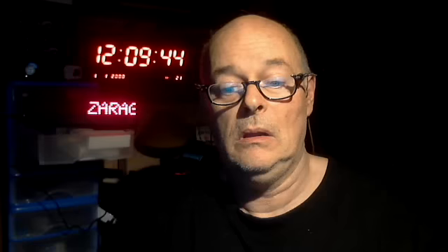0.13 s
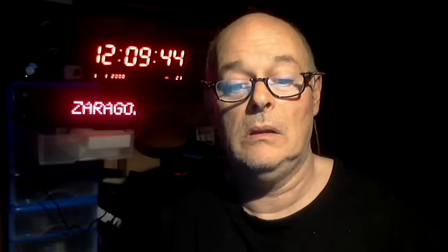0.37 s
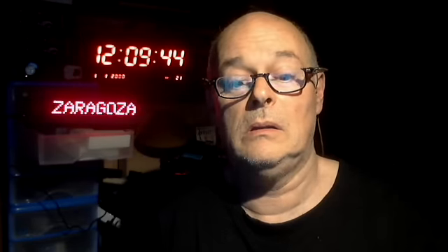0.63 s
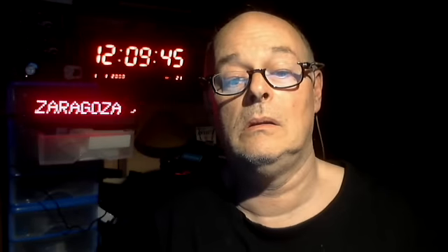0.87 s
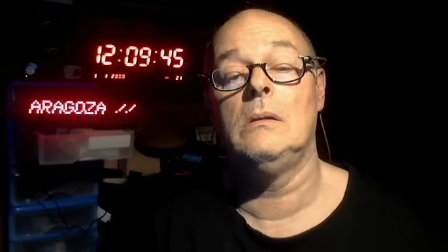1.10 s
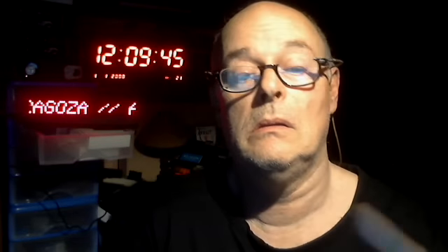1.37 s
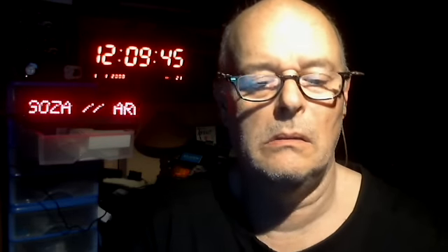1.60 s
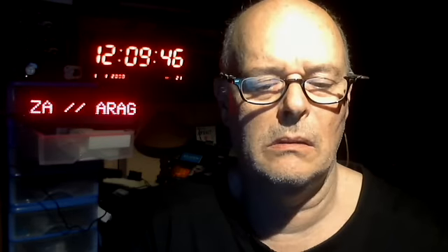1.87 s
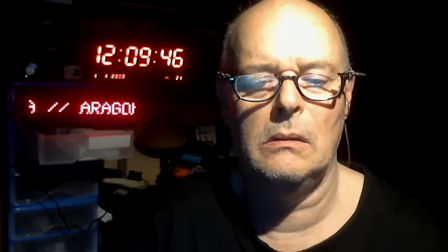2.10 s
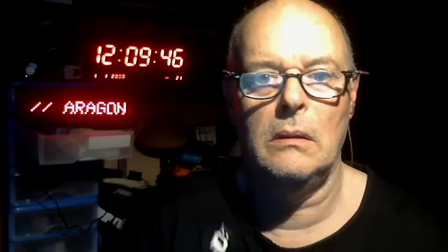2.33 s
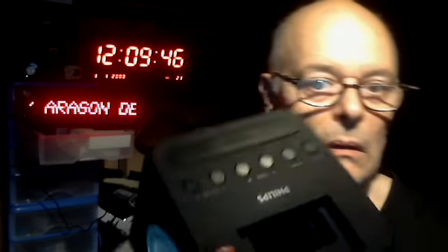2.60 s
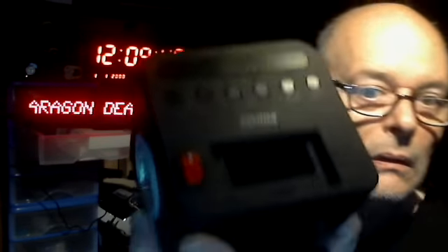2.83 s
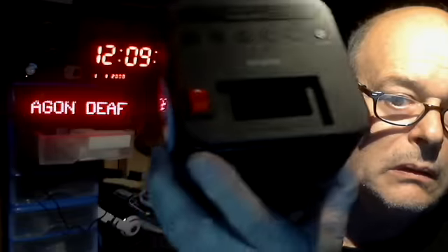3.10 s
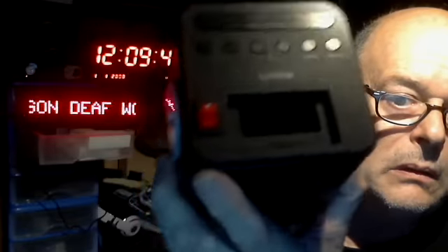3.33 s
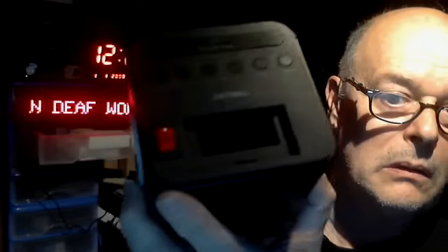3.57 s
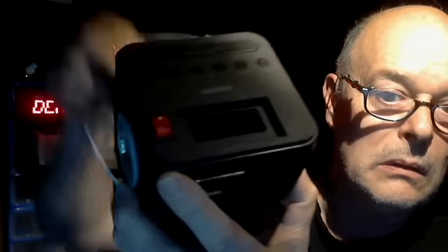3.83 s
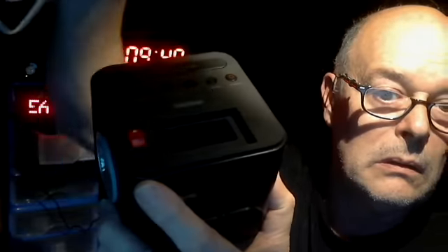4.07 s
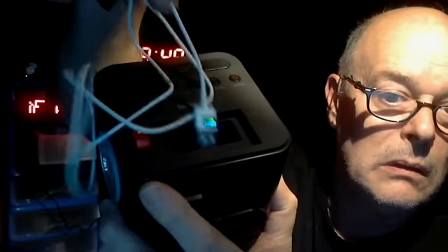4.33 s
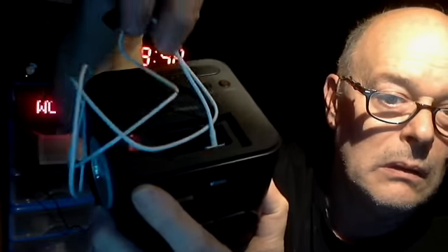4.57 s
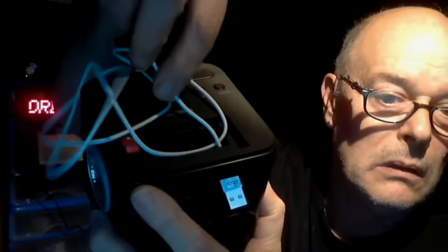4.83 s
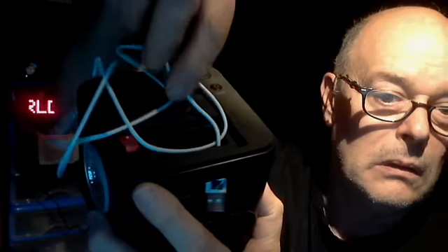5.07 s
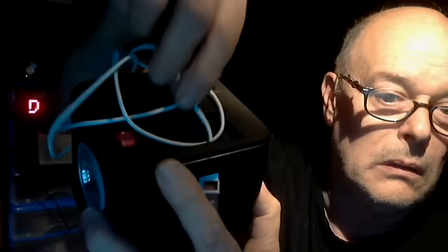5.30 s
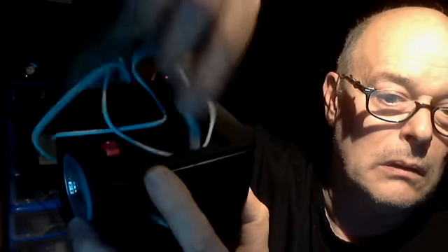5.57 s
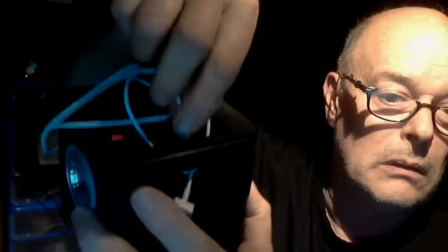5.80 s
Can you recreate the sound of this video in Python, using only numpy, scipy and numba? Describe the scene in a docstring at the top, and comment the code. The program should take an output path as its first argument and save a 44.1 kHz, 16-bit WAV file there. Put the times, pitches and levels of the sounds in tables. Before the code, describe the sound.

A quiet, dry room with a low steady fan, faint hiss and thin motor whine, heard through a small close microphone. Very faint touches open it; a crisp click comes at 0.9 s and a stronger one at 1.5 s, followed by small ticks and light rubbing. At 2.1 s a hard, loud plastic knock nearly overloads the microphone, with a low grip thump and soft finger slides. Small clicks follow around 2.6 s and a dull thump at 2.9 s. From 3.3 to 3.8 s there is only smooth palm hiss and muted hollow finger rubbing. A click at 3.95 s, then from 4.3 to 4.8 s a cluster of dry, bright plug taps on the hollow case. Wire brushes and a rub come at 5.1-5.3 s. From 5.4 s taps crowd into a sharp, irregular, loud rattle with gritty cable scraping, continuing almost to the end near 5.9 s.

```python
"""Plugs tap and rattle on a hollow plastic case close to a small microphone in a quiet room: noise rings its modes.
Wires brush the case (swelling noise, same modes) and drag on each other (gritty noise, fixed resonances).
Fingers slide and sound its cavity, a palm hisses, grips thump: friction noise through resonances.
Fan noise, a faint rustle and whine lines fill the pauses; the loudest blows overload the input."""
import sys
import numpy as np
from scipy import signal
from scipy.fft import rfft, irfft
from scipy.io import wavfile
from scipy.ndimage import uniform_filter1d
from numba import njit

SR = 44100
rng = np.random.default_rng(int(sys.argv[2]) if len(sys.argv) > 2 else 0)


def attenuation_scalar(level_db):
    """Turn a level in dB into a linear amplitude multiplier (20 dB per decade)."""
    decades = np.asarray(level_db, float) / 20
    return 10 ** decades


def dump_mix(stems):
    """Bounce the given channels to the path in sys.argv[1] as a 16-bit WAV at rate SR."""
    frames = np.atleast_2d(stems).T  # one column per channel
    limited = np.clip(frames, -1, 1)  # hard clip at full scale
    pcm = np.round(limited * 32767).astype(np.int16)
    wavfile.write(sys.argv[1], SR, pcm)


N = 261513

# sudden taps: (time [s], peak at 2.5-5 kHz before tail cut [dB], boom tilt 0.3-1.2 kHz [dB],
# tick tilt 5-8 kHz [dB], rattle t60 [s], favoured ring [Hz])
PLUG_TAPS = [(.214, -47, 2.5, 2, 0.057, 494), (.9023, -19.5, -30, -17, .09, 4260),
             (.9737, -48.5, -12, -3, .06, 4150), (1.308, -32, -5, -5, 0.069, 800),
             (1.5017, -12, -14.5, -3, 0.094, 3700), (1.6005, -28, -12, -10.5, 0.14, 2070),
             (1.7912, -46, 17, -12, 0.041, 1140), (2.0935, 1.5, -9, -11.5, 0.074, 720),
             (2.1022, -11.5, -9.5, -8, 0.12, 800), (2.5527, -16.5, -34, -4, 0.035, 4400),
             (2.5698, -25, -10, -7, 0.036, 872), (2.6284, -30, 1, 4.5, 0.14, 730),
             (2.6669, -23.5, -16, -28, 0.085, 1530), (2.9379, -27.5, 0, -21.5, 0.19, 860),
             (3.1016, -41.5, -11.5, -18.5, 0.06, 1560), (3.9452, -23, -24.5, -1, 0.055, 5640),
             (4.338, -13, -32, -7, 0.046, 3570), (4.3675, -21, -25, -9, 0.056, 2350),
             (4.3934, -5.5, -10.5, -11.5, 0.041, 1000), (4.423, -11, -28.5, -1, 0.055, 1780),
             (4.4685, -5.5, -42, -5, 0.091, 4300), (4.4831, -13, -30, -18, 0.062, 1770),
             (4.5717, -30.5, -43.5, -18, .032, 1780), (4.7104, -12, -23.5, -11.5, 0.09, 1780),
             (4.8051, -13.5, -29, -16, 0.033, 1780), (4.9937, -37, -15.5, -1.5, .065, 6850),
             (5.0398, -32.5, -39, -23.5, 0.038, 3060), (5.2724, -9.5, -19, -6, 0.024, 3930),
             (5.4003, -31, -6, 2.5, 0.041, 501), (5.4128, -18, -35, -35, 0.019, 1780),
             (5.4419, -20.5, -10, -5.5, 0.027, 3900), (5.4743, 4.5, -15.5, -2, 0.076, 5840),
             (5.5262, -15.5, -15, -5.5, 0.076, 6000), (5.5794, -16.5, -19.5, -10, 0.1, 4080),
             (5.5877, -20, -39, -14, 0.06, 2720), (5.601, -3, -5, 7, 0.039, 6570),
             (5.6082, 1.6, -27, -1.5, 0.057, 3100), (5.6508, -2.5, -16.5, -1, 0.055, 4030),
             (5.6679, -1.5, -16, -32, 0.082, 3800), (5.674, 1.3, -38, -11, 0.026, 3930),
             (5.7292, -1, -9, -2.5, 0.067, 3200), (5.7519, -2.5, -8.5, -8, 0.047, 4000),
             (5.8189, -14.5, -30, -4, 0.043, 6530), (5.8438, -4.5, -16, -13.5, 0.049, 3900)]
TAP_HELD_S, HELD_PER_T60 = 0.008, 0.4  # free ring: fixed time plus a share of the rattle
TAP_KNOCK_DB, TAP_EDGE_DB = -4, -17.5  # 1.2-2.5 and 9-16 kHz, before boom and tick pull them along


def taps():
    """Plugs knocking on the case: dry, with a little ring."""
    rows = []
    for s, db, boom, tick, t60, hz in PLUG_TAPS:
        colour = colours(boom, tick, hz, TAP_KNOCK_DB, TAP_EDGE_DB)
        rows.append((s, db, *colour, t60, TAP_HELD_S + HELD_PER_T60 * t60, hz))
    return strike(rows, tap, spot_db=2.5, broad_db=-3, favour_db=9)


def tap(t, rattle, t60, end_s, click=6.0):
    """A hard one-sample click and a dying rattle."""
    rise = np.minimum(t / 0.0003, 1)
    return rise * attenuation_scalar(-60 * t / max(t60, 0.005)) * rattle + click * (t == 1 / SR)


# wires brushing past: (time [s], peak at 2.5-5 kHz before tail cut [dB], boom tilt [dB], tick tilt [dB],
# length [s], favoured ring [Hz])
WIRE_BRUSHES = [(0.024, -54, 5.5, 6, 0.026, 6700), (0.372, -40, 1, 13.5, 0.055, 6170),
                (0.399, -31, -27, -2, 0.054, 1500), (0.843, -35.5, -60, -4, 0.072, 4130),
                (1.147, -33.5, -47, -9, 0.056, 2100), (1.276, -40.5, -11, 0, 0.042, 3930),
                (1.493, -26.5, -8, 1, 0.027, 4300), (1.653, -20, -4.5, -7.5, 0.096, 3930),
                (1.862, -29, -4, 4, .045, 6050), (2.032, -31, -5, -7.5, 0.27, 1140),
                (2.135, -22, 2.5, -9, .11, 2790), (2.225, -34, 2, -20.5, 0.036, 3500),
                (2.524, -37.5, -11, -6.5, 0.044, 1500), (2.563, -27.5, -2.5, -3.5, 0.12, 2100),
                (2.628, -27.5, -4.5, -2, 0.047, 6700), (2.661, -20.5, -19, -7.5, .055, 6750),
                (2.924, -38, 13, -6, 0.022, 415), (2.951, -31, 1, 1.5, 0.047, 800),
                (3.031, -46.5, -1.5, -4, 0.053, 1500), (3.107, -61, -11, 11.5, 0.031, 7300),
                (3.939, -31.5, -30, -2, 0.018, 6400), (4.544, -40.5, -56, -11.5, 0.033, 3090),
                (4.702, -24.5, -48, -5, 0.023, 4800), (4.729, -30.5, -41, -19, 0.11, 2800),
                (5.062, -25.5, -16.5, -16.5, .04, 3070), (5.118, -19, -11.5, -13.5, 0.059, 3930),
                (5.195, -11, -16.5, -6, 0.057, 6330), (5.315, -11, -13, -5.5, .045, 6400),
                (5.447, -21.5, -20, -19, 0.048, 3070), (5.659, -13.5, -27, -3, 0.024, 3007),
                (5.775, -14.5, -24, -6.5, 0.045, 3090), (5.865, -24, -4, -28, 0.013, 800)]
SWELL_SHARE, SWELL_MAX_S = 0.44, 0.027
BRUSH_KNOCK_DB, BRUSH_EDGE_DB = -0.5, -24.5  # before boom and tick pull them along


def brushes():
    """Wires sweeping the case: each swells for a share of its length."""
    rows = []
    for s, db, boom, tick, length_s, hz in WIRE_BRUSHES:
        colour = colours(boom, tick, hz, BRUSH_KNOCK_DB, BRUSH_EDGE_DB)
        swell_s = min(SWELL_SHARE * length_s, SWELL_MAX_S)
        rows.append((s, db, *colour, swell_s, length_s, hz))
    return strike(rows, brush, spot_db=1.5, broad_db=0, favour_db=8)


def brush(t, rattle, swell_s, end_s):
    """Soft contact: the noise swells, then sags until the wire lets go."""
    swell = (t / swell_s) ** 0.8
    sag = attenuation_scalar(-16 * (t - swell_s) / max(end_s - swell_s, 0.005))
    return rattle * np.where(t < swell_s, swell, sag)


KNOCK_PER_BOOM, EDGE_PER_TICK, RING_LIFT_DB = 0.2, 1.6, 9.5


def colours(boom, tick, ring_hz, knock_db, edge_db):
    """Boom, knock, tick and edge of one contact: knock follows boom and a ring near it, edge follows tick."""
    lift = RING_LIFT_DB * abs(ring(ring_hz, 1700, 700)) ** 2
    return boom, knock_db + KNOCK_PER_BOOM * boom + lift, tick, edge_db + EDGE_PER_TICK * tick


# modes of the plastic case: (frequency [Hz], relative level [dB], t60 [s])
CASE_MODES = [(211, -7.5, 0.18), (415, 12.5, 0.11), (599, 7.5, 0.027), (736, -3, 0.035), (800, 2, 0.029),
              (925, -20, 0.055), (1140, -8.5, 0.043), (1376, 0, 0.0061), (1500, 6, .035), (1780, 8, 0.041),
              (2100, -9.5, 0.013), (2350, -16.5, 0.058), (2800, 4, 0.02), (3085, 5, 0.036),
              (3500, -22, 0.075), (3930, 1.5, 0.0069), (4130, 0, 0.0083), (4300, 2.5, 0.033),
              (4800, -4, 0.002), (5400, -4.5, 0.002), (6220, 3, 0.017), (6190, -2, 0.0034),
              (6750, 4.5, 0.0045), (7300, -8.5, 0.0081), (8010, -7, 0.023), (9200, 7, 0.0022)]


def strike(rows, force, spot_db, broad_db, favour_db, size=8192, lead=256):
    """Each force rings the case; the touched spot sets each mode's share, the row sets the colour."""
    out = np.zeros(N + size)
    index = np.arange(size)
    t = np.maximum(index - lead, 0) / SR
    hz = np.fft.rfftfreq(size, 1 / SR)
    modes = np.array([attenuation_scalar(db) * ring(hz, f, np.log(1000) / np.pi / t60) for f, db, t60 in CASE_MODES])
    mode_hz = np.transpose(CASE_MODES)[0]
    core = (hz > 2500) & (hz < 5000)
    for s, peak_db, boom_db, knock_db, tick_db, edge_db, shape_s, end_s, ring_hz in rows:
        spot, rattle = rng.standard_normal(len(CASE_MODES)), rng.standard_normal((2, size))
        favour = abs(ring(mode_hz, ring_hz, 0.08 * ring_hz))
        share = attenuation_scalar(spot_db * spot + favour_db * favour) * np.sign(spot)
        colour = shape([(110, boom_db - 52.5), (330, boom_db + 2), (1000, boom_db + 13.5),
                        (1700, knock_db), (3500, 0), (6500, tick_db + 0.37), (7600, tick_db - 5),
                        (9500, edge_db + 2), (12000, edge_db - 7), (15000, edge_db - 19),
                        (18000, edge_db - 31.5)], hz)
        # the contact stutters within a few milliseconds
        stutter = attenuation_scalar(28 * uniform_filter1d(rattle[1], size=120))
        push = force(t, rattle[0] * stutter, shape_s, end_s) * (t > 0)
        sound = rfft(push) * colour * (share @ modes + attenuation_scalar(broad_db))
        # nearby surfaces send it back as a short diffuse wash
        wash = rng.standard_normal(size) * attenuation_scalar(-29 - 60 * index / SR / 0.068)
        sound += sound * rfft(wash)
        # each sound's tail is cut short, falling away faster and faster
        tail_cut = attenuation_scalar(-6 * (np.maximum(t - end_s, 0) / 0.009) ** 2) * np.minimum(index / lead, 1)
        core_peak = np.abs(irfft(sound * core)).max()
        i = int(s * SR) - lead
        out[i:i + size] += irfft(sound) * tail_cut * attenuation_scalar(peak_db) / core_peak
    return out[:N]


# fingers sliding over the case: (time [s], length [s], cavity [dB], overtones [dB], starting overtone centre [Hz])
FINGER_SLIDES = [(0.404, .04, -41, -53, 1189), (0.452, .075, -42, -43.5, 1318),
                 (1.609, .14, -37.5, -39, 1150), (1.796, .2, -43.5, -44, 1230),
                 (2.013, 0.089, -42, -40, 1100), (2.116, .13, -29, -31, 880),
                 (2.248, 0.059, -42, -32, 1250), (2.284, 0.1, -40.5, -29.5, 1350),
                 (2.359, .095, -56, -29.5, 887), (3.07, .07, -39.5, -59.5, 1100),
                 (3.299, 0.15, -31, -48.5, 1260), (3.461, .07, -50, -59, 1000),
                 (3.531, .04, -39, -54, 1000), (3.564, 0.11, -30, -45, 1299),
                 (3.665, 0.067, -32.5, -58, 1104), (3.744, .07, -31.5, -48, 966),
                 (3.816, .09, -45, -57, 1000), (3.95, 0.14, -42, -48, 780), (4.052, .1, -41, -46.5, 779),
                 (4.165, .09, -61, -51.5, 859), (5.044, 0.076, -74, -36.5, 1000),
                 (5.146, .235, -35, -42.5, 1050), (5.389, .055, -24, -44, 1000),
                 (5.512, .055, -28.5, -42, 1050), (5.617, 0.067, -58, -24.5, 830),
                 (5.743, .16, -44, -31.5, 880)]
SLIDE_ATTACK_S, SLIDE_RELEASE_S, SLIDE_SAG_DB, LIFT_DB = 0.029, 0.03, -6, -13
CENTRE_SAG = 0.88  # ratio, applied once by the release and again by lift-off


def slides():
    """Each slide: touch, sagging hold, lift-off; the overtone centre falls as the fingers slow down."""
    stretches = []
    for s, length_s, cavity, over, hz in FINGER_SLIDES:
        release_s = s + max(length_s - SLIDE_RELEASE_S, SLIDE_ATTACK_S)
        stretches.append([
            (s, cavity + LIFT_DB, over + LIFT_DB, hz),
            (s + SLIDE_ATTACK_S, cavity, over, hz),
            (release_s, cavity + SLIDE_SAG_DB, over + SLIDE_SAG_DB, hz * CENTRE_SAG),
            (s + length_s, cavity + LIFT_DB, over + LIFT_DB, hz * CENTRE_SAG ** 2)])
    return stretches


# cavity overtones: (centre [Hz], width per stage [Hz], relative level [dB])
CAVITY_OVERTONES = [(800, 200, 2.5), (1000, 360, -3.5), (1230, 76, 7), (1460, 340, -2)]
CAVITY_HZ, CAVITY_STAGE_WIDTH_HZ = 420.5, 84


def fingers():
    """Sliding skin drives the cavity and, through a moving band, its overtones."""
    cavity_gain, overtone_db, overtone_hz = played(slides())
    on = cavity_gain > 0
    touching = np.minimum(uniform_filter1d(1.0 * on, size=400), 1) * on
    cavity = cavity_gain * resonant(grit(75, 2.6), [(CAVITY_HZ, CAVITY_STAGE_WIDTH_HZ, 0)])
    rub = resonant(grit(70, 2.5), CAVITY_OVERTONES)
    overtones = unit(sweep(rub, np.maximum(overtone_hz, 500), 370.0))
    return cavity + overtones * attenuation_scalar(overtone_db) * touching


# grip shifting: (time [s], length [s], thump [dB], deep part re thump [dB])
GRIP_SHIFTS = [(0.433, 0.063, -51, -2), (1.668, 0.052, -46.5, 0), (2.076, .13, -25, -9),
               (2.227, 0.052, -41, -39), (2.291, 0.15, -34, 0), (2.55, 0.18, -30, -6.5),
               (2.911, .11, -17.5, 0), (3.02, 0.14, -37, 4), (3.957, .1, -34.5, -13),
               (4.097, .07, -41.5, -9), (5.142, 0.28, -41.5, -7)]
GRIP_RISE_SHARE, GRIP_START_DB, GRIP_END_DB = 0.28, -12, -21.5


def grips():
    """Each shift of the grip: a quick squeeze, then a slower easing."""
    return [[(s, db + GRIP_START_DB, deep),
             (s + GRIP_RISE_SHARE * length_s, db, deep),
             (s + length_s, db + GRIP_END_DB, deep)] for s, length_s, db, deep in GRIP_SHIFTS]


# thump resonances: (centre [Hz], width per stage [Hz], relative level [dB])
THUMP_PEAKS = [(160.5, 50, -1), (192, 84, 1)]
# deep thump resonance: (centre [Hz], width per stage [Hz], relative level [dB])
DEEP_PEAKS = [(85, 24, 0)]


def thumps():
    """Grip shifts drive low resonances with unsteady noise."""
    gain, deep_db = played(grips())
    deep = attenuation_scalar(deep_db) * resonant(grit(19, 1.7), DEEP_PEAKS)
    return gain * (resonant(grit(30, 5.4), THUMP_PEAKS) + deep)


# palm gliding over the plastic, one list per stretch: (time [s], level [dB], centre [Hz])
PALM_GLIDES = [
    [(1.3, -70, 7200), (1.8, -57, 7000), (2.26, -77, 6300), (2.306, -50.5, 6390), (2.44, -74, 6430)],
    [(3.27, -70, 7200), (3.348, -41.5, 7300), (3.456, -38.5, 7440), (3.5, -51.5, 5880), (3.52, -41, 5230),
     (3.62, -45, 6230), (3.74, -47, 6460), (3.765, -57, 6390), (4.05, -68, 7000), (4.2, -61, 7000),
     (4.3, -72, 6700)],
]
# skin hiss bands: (centre [Hz], width per stage [Hz], relative level [dB])
SKIN_BANDS = [(3580, 140, -8.5), (4660, 130, 7), (5130, 180, -20), (5600, 340, 8), (5720, 150, -2.5),
              (6640, 310, 3), (7250, 220, -3), (7315, 200, 4), (7970, 270, -8.5), (8650, 290, -8),
              (9130, 230, -11)]


def palm():
    """Friction hiss in fixed bands; the contact patch favours one region, which wanders."""
    gain, glide_hz = played(PALM_GLIDES)
    bands = resonant(grit(120, 1.6), SKIN_BANDS)
    centre_hz = np.clip(glide_hz, 3000, 9000)
    favoured = sweep(sweep(bands, centre_hz, 2400.0), centre_hz, 2400.0)
    skin = favoured + 0.34 * bands
    return gain * skin / np.std(skin[gain > 0])


# wires dragging on each other, one list per stretch: (time [s], level [dB])
WIRE_DRAGS = [
    [(1.6, -74), (1.676, -38), (1.77, -62)],
    [(5.17, -66.5), (5.23, -43.5), (5.546, -36.5), (5.67, -28), (5.818, -42.5), (5.92, -48.5)],
]


def drags():
    """Gritty wire friction through a broad hump and the case's upper modes."""
    def walls(hz):
        hump = ring(hz, 3270, 5600) / (1 + (hz / 8500) ** 6)
        return hump * (0.46 + sum(attenuation_scalar(db) * ring(hz, f, 250) for f, db, _ in CASE_MODES[8:]))
    return played(WIRE_DRAGS)[0] * unit(through(grit(150, 2.5), walls))


def played(tables):
    """Columns of all stretches on the time axis; the first is a level, faded in and out at each end."""
    out = np.ones((len(tables[0][0]) - 1, N))
    out[0] = 0
    for rows in tables:
        s, db, *columns = np.transpose(rows)
        now = np.arange(int(s[0] * SR), min(int(s[-1] * SR), N))
        for k, column in enumerate(columns):
            out[k + 1, now] = np.interp(now / SR, s, column)
        to_end = np.minimum(now - now[0], now[-1] - now)
        fade = np.minimum(to_end / (0.0073 * SR), 1)
        out[0, now] += attenuation_scalar(np.interp(now / SR, s, db)) * fade
    return out


# room noise spectrum: (frequency [Hz], relative density [dB])
ROOM_SPECTRUM = [(25, -64.5), (60, -17.5), (100, -6), (145, 2.5), (215, -12.5), (280, -12.5), (700, -9),
                 (1100, -11.5), (1500, -13.5), (2600, -22), (4200, -20), (6500, -21), (7500, -21),
                 (8300, -31), (11000, -40.5), (17000, -71)]
SPLIT_HZ, FAN_DB = 1300, -58


def fan():
    """Fan: the lower part of the room noise, its level barely wavering."""
    bass = through(rng.standard_normal(N),
                   lambda hz: shape(ROOM_SPECTRUM, hz) / (1 + (hz / SPLIT_HZ) ** 4))
    return unit(bass) * attenuation_scalar(FAN_DB + 0.24 * walk(10))


# treble hiss, mean level: (time [s], level [dB])
RUSTLE_LEVEL = [(0, -63), (.6, -59.5), (1.2, -64), (2.3, -56.5), (2.5, -59.5), (3.15, -64), (3.4, -59),
                (4.298, -61), (5.0, -63.5), (5.93, -61)]


def rustle():
    """Faint rustle: the upper part of the room noise, rising and falling."""
    treble = through(rng.standard_normal(N),
                     lambda hz: shape(ROOM_SPECTRUM, hz) / (1 + (SPLIT_HZ / (hz + 1)) ** 4))
    level_db = np.interp(np.arange(N) / SR, *np.transpose(RUSTLE_LEVEL))
    return unit(treble) * attenuation_scalar(level_db + walk(21))


# motor whine: (frequency [Hz], level before wander [dB rms])
WHINE_LINES = [(215, -65), (510, -67.5), (705, -70.5), (1017, -63.5), (1529, -77)]


def whine():
    """Motor whine: thin sine lines, wandering in level and phase."""
    t = np.arange(N) / SR
    out = np.zeros(N)
    for f, db in WHINE_LINES:
        level = np.sqrt(2) * attenuation_scalar(db + 1.5 * walk(20))
        out += level * np.sin(2 * np.pi * f * t + 0.8 * walk(24))
    return out


def unit(x):
    """Scale to rms 1."""
    return x / np.sqrt(np.mean(x ** 2))


def shape(points, hz):
    """Gain of (Hz, dB) points joined on a log-frequency axis."""
    at, db = np.transpose(points)
    return attenuation_scalar(np.interp(np.log(hz + 1), np.log(at), db))


def ring(hz, centre_hz, width_hz):
    """Response of one resonance, gain about 1 at its centre."""
    return 1 / (1 + 1j * (hz - centre_hz ** 2 / (hz + 1)) / width_hz)


def through(x, response):
    """Filter by a function of frequency."""
    return irfft(rfft(x) * response(np.fft.rfftfreq(len(x), 1 / SR)), len(x))


def resonant(x, peaks):
    """Noise through steep two-stage resonances, rms 1."""
    return unit(through(x, lambda hz: sum(attenuation_scalar(db) * ring(hz, f, w) ** 2 for f, w, db in peaks)))


def walk(rate):
    """Random levels held 1 / rate s and slewed twice; rms 1."""
    k = max(int(SR / rate), 2)
    held = np.repeat(rng.standard_normal(N // k + 1), k)
    return unit(uniform_filter1d(uniform_filter1d(held, k), k)[:N])


def grit(rate, depth_db):
    """Friction: noise whose level stutters as skin sticks and slips."""
    return unit(rng.standard_normal(N) * attenuation_scalar(depth_db * walk(rate)))


@njit
def sweep(x, hz, width):
    """State-variable band-pass with a moving centre."""
    y, band, low = np.empty(len(x)), 0., 0.
    for i in range(len(x)):
        g, k = np.tan(np.pi * hz[i] / SR), width / hz[i]
        v = (band + g * (x[i] - low)) / (1 + g * (g + k))
        band, low, y[i] = 2 * v - band, low + 2 * g * v, k * v
    return y


def scene():
    """All sources at one microphone."""
    handling = taps() + brushes() + fingers() + thumps() + palm() + drags()
    return (handling + fan() + rustle() + whine())[None]


def band_limit(x):
    """A steep low-pass at the top of the band."""
    return signal.sosfilt(signal.butter(12, 20000, fs=SR, output="sos"), x)


MIC_LOW_HZ, MIC_TOP_HZ = 64.6, 16100


def record(dry):
    """The small capsule loses the deepest bass; the input clips on the hardest blows, then is band-limited."""
    low_cut = signal.butter(2, MIC_LOW_HZ, "high", fs=SR, output="sos")
    clipped = np.clip(signal.sosfilt(low_cut, dry), -0.98, 0.98)
    # the low cut acts again after clipping
    band = np.vstack([low_cut, signal.butter(8, MIC_TOP_HZ, fs=SR, output="sos")])
    mix = np.clip(signal.sosfilt(band, clipped), -1, 1)
    return band_limit(mix)


dry = scene()
out = record(dry)
dump_mix(out)
```